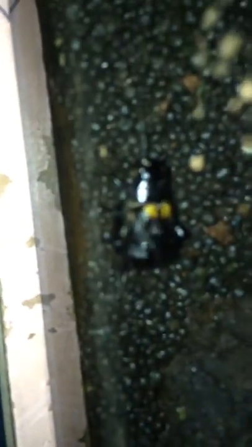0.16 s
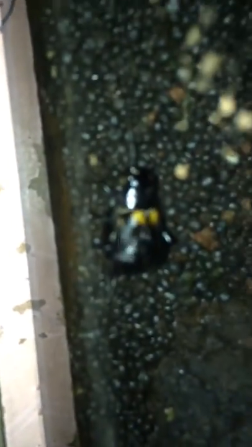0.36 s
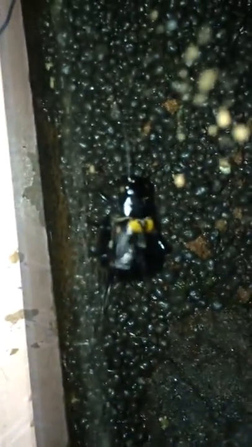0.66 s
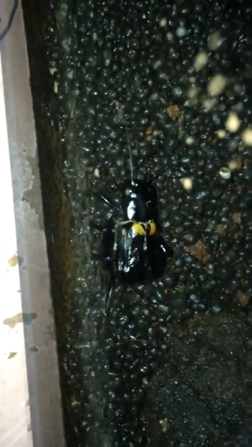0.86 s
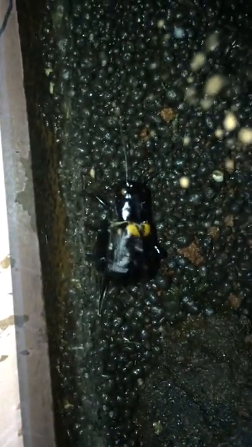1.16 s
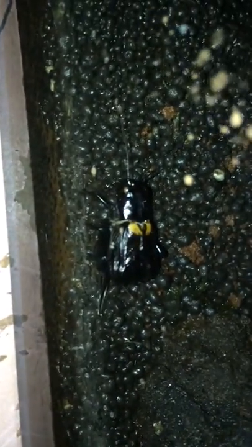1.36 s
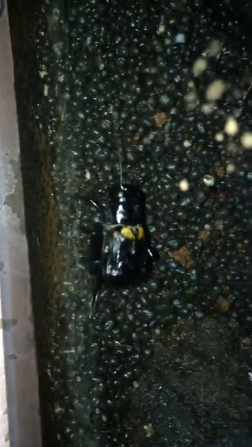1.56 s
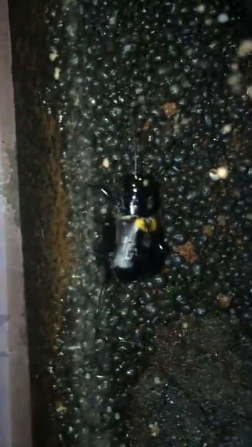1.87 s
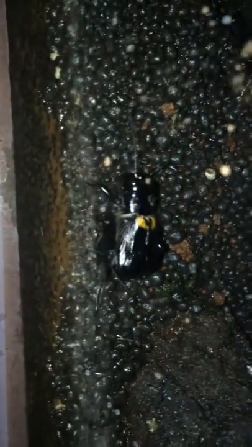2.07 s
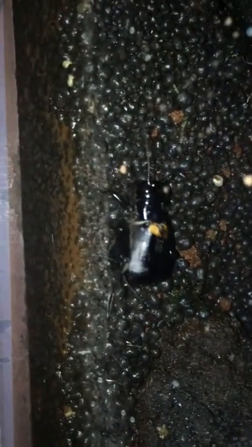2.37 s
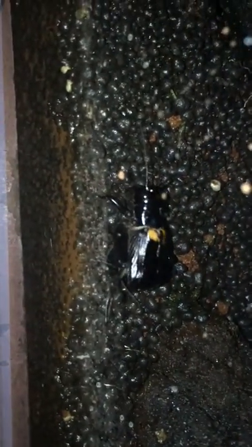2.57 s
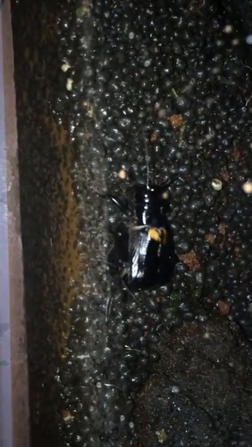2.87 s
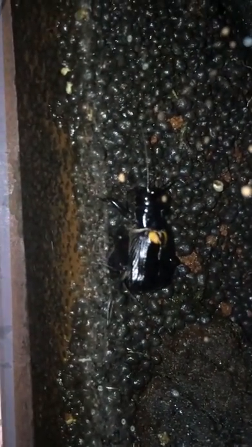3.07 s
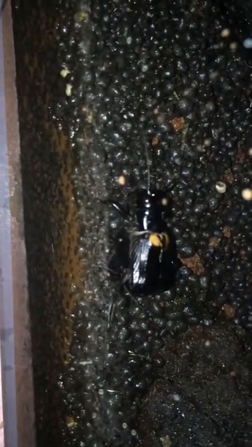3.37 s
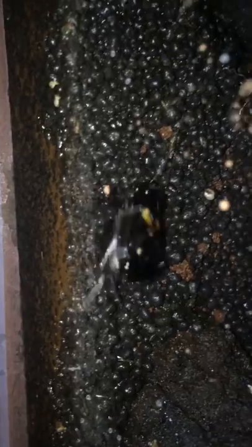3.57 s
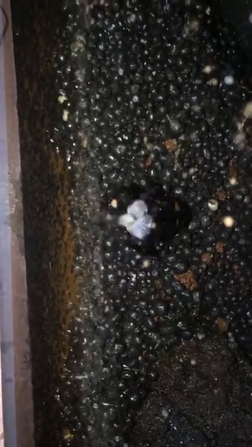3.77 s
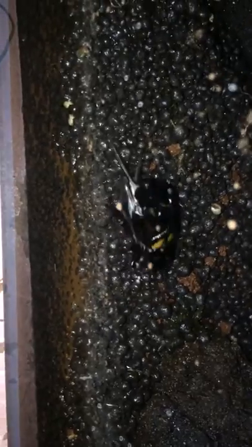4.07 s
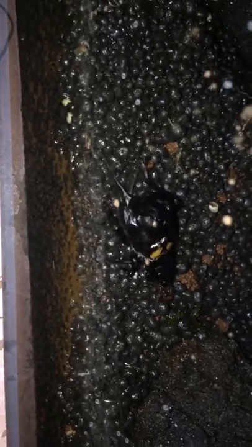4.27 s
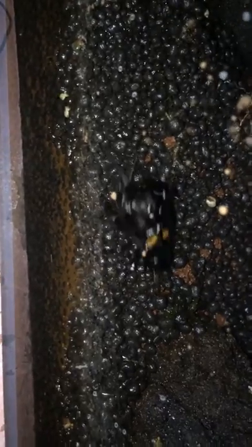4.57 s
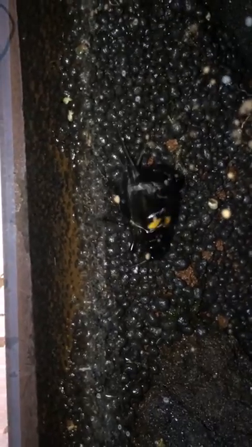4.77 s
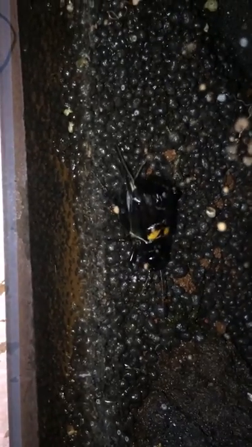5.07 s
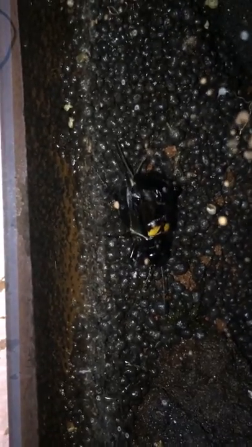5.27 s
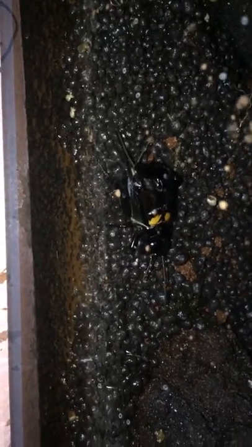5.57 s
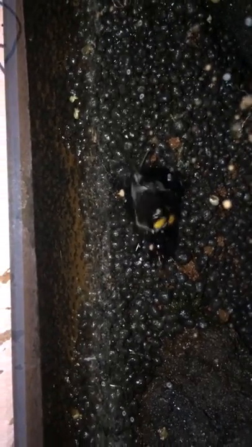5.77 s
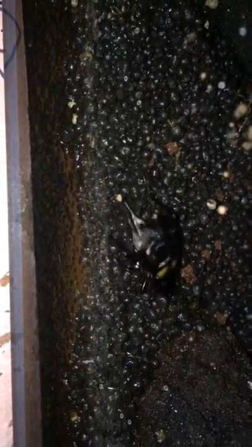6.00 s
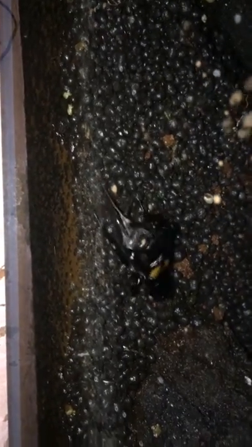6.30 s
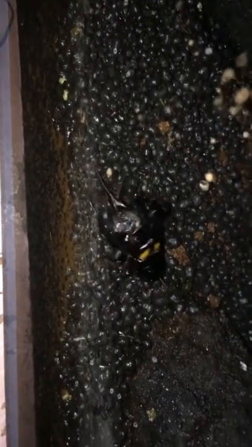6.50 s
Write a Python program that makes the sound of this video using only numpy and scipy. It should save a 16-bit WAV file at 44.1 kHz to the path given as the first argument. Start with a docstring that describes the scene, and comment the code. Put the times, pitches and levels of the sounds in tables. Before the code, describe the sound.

A cricket close by gives short, shrill, buzzing chirps that ring in a bare room at night, over a faint low hum.

```python
"""The ringing tail of a chirp dies away over hum; then a field cricket calls on a hard floor in a bare room at night.
Each chirp is five wing strokes: tones sliding down in pitch, with an octave and a dry rasp of noise.
Decaying noise, convolved with each chirp, blurs the strokes into a ringing tail.
Faint ticks are filtered noise bursts; mains hum is a sum of sines; rumble and hiss are coloured noise."""
import sys
import numpy as np
from scipy import signal
from scipy.fft import rfft, irfft
from scipy.io import wavfile

SR = 44100
rng = np.random.default_rng(int(sys.argv[2]) if len(sys.argv) > 2 else 0)


def unload_wav(signal):
    """Save mono or channel-first audio to the path in sys.argv[1] as 16-bit WAV at rate SR, clipped to [-1, 1]."""
    wavfile.write(
        sys.argv[1],
        SR,
        np.round(np.clip(np.atleast_2d(signal).T, -1, 1) * 32767).astype(np.int16),
    )


N = 292824


def from_db(db):
    """Amplitude factor of a level in dB."""
    return 10 ** (np.asarray(db) / 20)


def rms_one(x):
    """Scale to rms 1."""
    return x / np.sqrt(np.mean(x ** 2) + 1e-20)


def at_hz(points, hz):
    """Read a (Hz, value) curve, linear over log frequency."""
    curve_hz, values = np.array(points).T
    return np.interp(np.log(np.maximum(hz, 1)), np.log(curve_hz), values)


def drift(rate_hz, count):
    """Slow chance: noise through a double one-pole low-pass, rms 1."""
    pole = np.exp(-2 * np.pi * rate_hz / SR)
    noise = rng.standard_normal(count + SR)
    settled = signal.lfilter([1], [1, -2 * pole, pole * pole], noise)[SR:]
    return rms_one(settled)


def coloured(spectrum, count):
    """Noise shaped by a spectrum in dB, rms 1."""
    hz = np.fft.rfftfreq(count, 1 / SR)
    white = rfft(rng.standard_normal(count))
    return rms_one(irfft(white * from_db(at_hz(spectrum, hz)), count))


def band_pass(order, low_hz, high_hz, x):
    """Butterworth band-pass."""
    return signal.sosfilt(signal.butter(order, [low_hz, high_hz], "band", fs=SR, output="sos"), x)


def resonance(centre_hz, width_hz, x):
    """Two-pole peak filter, gain 1 at its centre."""
    return signal.lfilter(*signal.iirpeak(centre_hz, centre_hz / width_hz, SR), x)


STROKE_S = 0.0165
TONE_PEAK_S = 0.0068
CONTACT_ATTACK_S, CONTACT_HOLD_S = 0.0027, 0.0047
SAG_PER_S = 7.71  # share of the start pitch lost per second of stroke
TOOTH_JITTER, JITTER_HZ = 0.0091, 530  # uneven tooth spacing: rms share of pitch, speed
SCRAPE_DB = -40
WING_HZ, WING_WIDTH_HZ = 6630, 2300  # main resonance of the wing's harp
WING_LOW_HZ, WING_HIGH_HZ = 5040, 7000
OCTAVE_LOW_HZ, OCTAVE_HIGH_HZ = 10700, 12970
# before and after the turn
OCTAVE_PEAK_HZ, OCTAVE_PEAK_WIDTH_HZ, OCTAVE_PEAK_GAIN = [13090, 12000], 220, [1.6, 0.6]
# Strength of the successive strokes in a chirp. Each entry: level in dB.
STROKE_LEVELS_DB = [1.5, 4, 5, 2.5, -7.5]
# Spectrum shape of the scraper's rasp. Each row: frequency in Hz, relative density in dB per Hz.
SCRAPE_SPECTRUM = [(3500, -16), (5000, -2), (7000, 18.5), (8300, -24.5), (12500, -12.5), (13800, 1.5),
                   (14700, -1.5), (15200, -1), (17000, -14)]


def chirp(start_hz, spacing_s, overtone_db, turned):
    """The scraper runs along the file once a stroke and slows, so the wing's tone and its octave slide down."""
    t = np.arange(int(STROKE_S * SR)) / SR
    swell = np.interp(t, [0, TONE_PEAK_S, STROKE_S], [0, 1, 0])
    hold_end_s = CONTACT_ATTACK_S + CONTACT_HOLD_S
    touch = np.interp(t, [0, CONTACT_ATTACK_S, hold_end_s, STROKE_S], [0, 1, 1, 0])
    tone, octave, rasp = np.zeros((3, SR // 5))
    for k, stroke_db in enumerate(STROKE_LEVELS_DB):
        jitter = 1 + TOOTH_JITTER * drift(JITTER_HZ, count=len(t))
        hz = start_hz * (1 - SAG_PER_S * t) * jitter
        phase = 2 * np.pi * (np.cumsum(hz) / SR + rng.random())
        first = round(k * spacing_s * SR)
        at = slice(first, first + len(t))
        contact = from_db(stroke_db) * touch
        tone[at] += from_db(stroke_db) * swell * np.sin(phase)
        octave[at] += from_db(overtone_db) * contact * np.sin(2 * phase)
        rasp[at] += from_db(SCRAPE_DB) * contact * coloured(SCRAPE_SPECTRUM, count=len(t))
    tone = resonance(WING_HZ, WING_WIDTH_HZ, tone)
    lift = resonance(OCTAVE_PEAK_HZ[turned], OCTAVE_PEAK_WIDTH_HZ, octave)
    octave = octave + OCTAVE_PEAK_GAIN[turned] * lift
    radiated_tone = band_pass(3, WING_LOW_HZ, WING_HIGH_HZ, tone)
    radiated_octave = band_pass(4, OCTAVE_LOW_HZ, OCTAVE_HIGH_HZ, octave)
    return radiated_tone + radiated_octave + rasp


LENGTH = SR  # samples kept of each chirp and its tail
ROOM_DB = 7  # total echo energy, re unity gain
LATE_DB, LATE_STRETCH = -22, 2  # weaker, slower tail from the farther space: level, multiple of T60
ECHO_CLUMP_DB, ECHO_CLUMP_HZ = 1.5, 147  # reflections arrive in clumps
# Reverberation per band, low to high. Each row: nominal band frequency in Hz, T60 in seconds.
ROOM_DECAY = [(2000, 0.58), (6000, 0.44), (12500, 0.33), (15000, 0.27)]


def echoes(rise_s):
    """Dense reflections, dying faster in the treble: bands of noise, each with its own decay."""
    t, hz = np.arange(LENGTH) / SR, np.fft.rfftfreq(LENGTH, 1 / SR)
    white, out = rfft(rng.standard_normal(LENGTH)), 0
    edges_hz = [0, 4000, 9000, 13400, SR]
    for (_, t60_s), low_hz, high_hz in zip(ROOM_DECAY, edges_hz, edges_hz[1:]):
        early = from_db(-60 * t / t60_s)
        late = from_db(LATE_DB - 60 * t / (LATE_STRETCH * t60_s))
        band = irfft(white * ((hz >= low_hz) & (hz < high_hz)), LENGTH)
        out = out + np.hypot(early, late) * band
    build_up = 1 - np.exp(-(t / rise_s) ** 2)
    clumps = from_db(ECHO_CLUMP_DB * drift(ECHO_CLUMP_HZ, count=LENGTH))
    out = out * build_up * clumps
    return from_db(ROOM_DB) * out / np.sqrt(np.sum(out ** 2))


TURN_S = 3.75  # the insect turns round
DIRECT_DB, ECHO_RISE_S = [1.4, 3], [0.0072, 0.011]  # before and after the turn
# Chirps of the call. Each row: start in seconds, level in dB, pitch at the start of a stroke in Hz,
# stroke spacing in seconds, octave level in dB.
CHIRP_EVENTS = [(-.25, -29, 6530, .0235, -28), (0.193, -26, 6540, 0.025, -37),
                (0.4466, -26.5, 6520, 0.025, -36), (0.7318, -26.5, 6514, 0.026, -35.5),
                (1.2436, -26.5, 6494, 0.027, -36.5), (1.583, -26.5, 6523, 0.025, -35.5),
                (1.9281, -26, 6530, 0.022, -35), (2.2053, -27, 6533, 0.025, -34.5),
                (2.4678, -27.5, 6500, 0.024, -34), (2.7473, -27, 6510, 0.025, -33),
                (3.0197, -27.5, 6516, 0.025, -32.5), (4.2504, -32, 6382, 0.023, -33),
                (4.4656, -28, 6474, .0245, -35), (4.8499, -28.5, 6470, .024, -33.5),
                (5.2039, -28, 6480, 0.027, -34), (5.7975, -28, 6467, 0.025, -34.5),
                (6.0537, -28, 6460, 0.025, -34), (6.3423, -28, 6464, 0.023, -36),
                (6.5773, -25.5, 6470, .0225, -40)]


def cricket():
    """Insect and microphone shift by a wavelength between chirps, so each one meets a new pattern of echoes."""
    out = np.zeros(N + 2 * SR)  # 1 s margin at both ends
    for start_s, level_db, start_hz, spacing_s, overtone_db in CHIRP_EVENTS:
        turned = int(start_s > TURN_S)
        path = echoes(ECHO_RISE_S[turned])
        path[0] = from_db(DIRECT_DB[turned])
        dry_chirp = chirp(start_hz, spacing_s, overtone_db, turned)
        at = SR + round(start_s * SR)
        out[at:at + LENGTH] += from_db(level_db) * signal.fftconvolve(dry_chirp, path)[:LENGTH]
    return out[SR:SR + N]


TICK_SPAN = 1.42  # band edges lie this factor below and above the centre
# Faint dry ticks. Each row: start in seconds, level before the filter in dB,
# decay time constant in seconds, centre in Hz.
TICK_EVENTS = [(2.047, -46.5, 0.00089, 4400), (3.078, -42.5, .0008, 4300), (4.854, -52.5, 0.0075, 2400),
               (4.930, -42.5, 0.0006, 4600), (5.197, -58.5, .006, 2600)]


def ticks():
    """Exponentially decaying noise bursts, each through a band-pass."""
    out, t = np.zeros(N), np.arange(SR // 20) / SR
    for start_s, level_db, decay_s, centre_hz in TICK_EVENTS:
        burst = np.exp(-t / decay_s) * rng.standard_normal(len(t))
        tick = band_pass(2, centre_hz / TICK_SPAN, centre_hz * TICK_SPAN, burst)
        out[round(start_s * SR):][:len(t)] += from_db(level_db) * tick
    return out


MAINS_HZ = 50.15
HUM_WAVER_DB, HUM_WAVER_HZ = 1.5, 0.86
# Mains harmonics. Each row: multiple of the mains frequency, mid level in dB rms.
HUM_HARMONICS = [(1, -68), (2, -69.5), (4, -62), (6, -77.5), (8, -88.5), (9, -84.5), (10, -88.5), (13, -85)]


def hum():
    """Multiples of the mains frequency, each wavering a little in level."""
    t, out = np.arange(N) / SR, 0
    for multiple, level_db in HUM_HARMONICS:
        gain = np.sqrt(2) * from_db(level_db + HUM_WAVER_DB * drift(HUM_WAVER_HZ, count=N))
        out = out + gain * np.sin(2 * np.pi * (round(multiple) * MAINS_HZ * t + rng.random()))
    return out


FLOOR_DB, FLOOR_PATCHY_DB, FLOOR_PATCHY_HZ = -60, 0.57, 4.0
# Spectrum shape of rumble and hiss. Each row: frequency in Hz, relative density in dB per Hz.
FLOOR_SPECTRUM = [(20, -22), (35, -17), (48, -7), (75, -5.5), (165, -0.5), (230, -6), (330, -18.5),
                  (700, -25.5), (1100, -30), (1550, -26), (2500, -35.5), (4500, -37), (7000, -40.5),
                  (10600, -41.5), (15500, -40.5)]


def floor():
    """Far machinery through the walls and the hiss of the microphone: one coloured noise, level drifting."""
    gain = from_db(FLOOR_DB + FLOOR_PATCHY_DB * drift(FLOOR_PATCHY_HZ, count=N))
    return gain * coloured(FLOOR_SPECTRUM, count=N)


def scene():
    """Sum of all sources, one channel."""
    return (cricket() + ticks() + hum() + floor())[None]


CUTOFF_HZ = 15500


def record(dry):
    """Steep low-pass: 50 dB down from the cutoff upward."""
    return signal.sosfilt(signal.cheby2(24, 50, CUTOFF_HZ, fs=SR, output="sos"), dry)


dry = scene()
out = record(dry)
unload_wav(out)
```